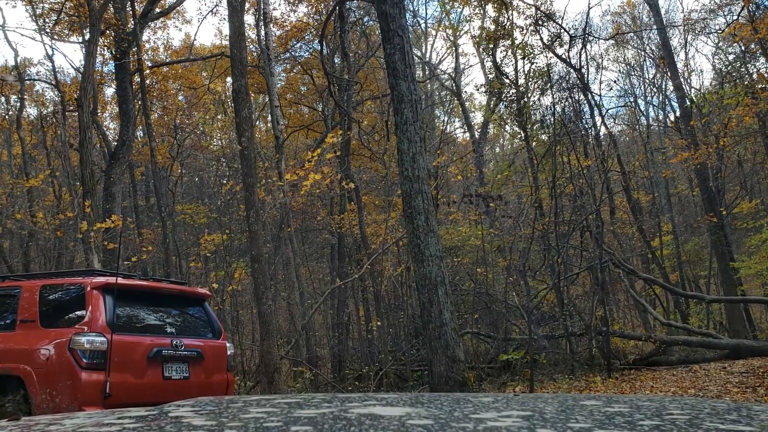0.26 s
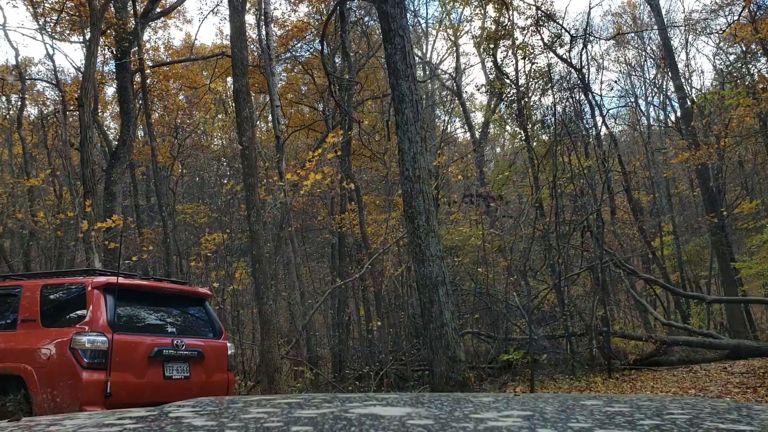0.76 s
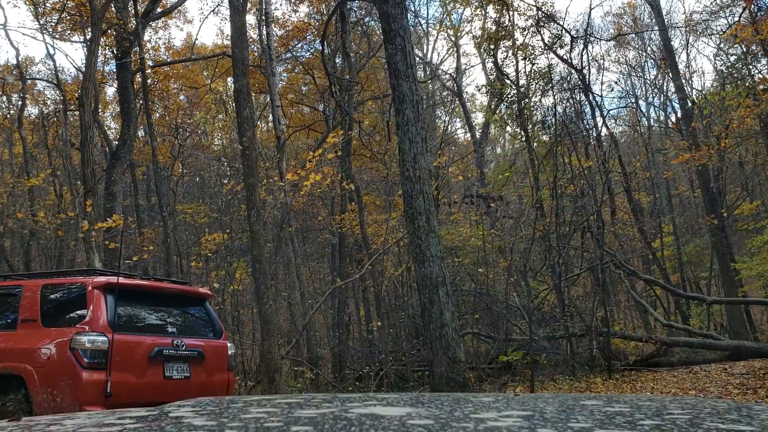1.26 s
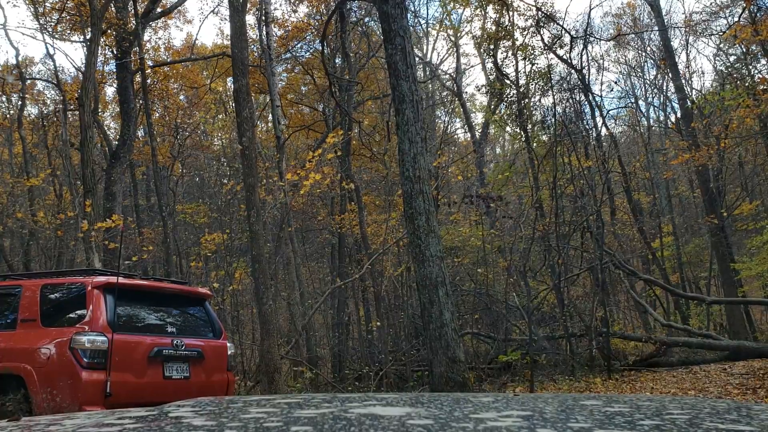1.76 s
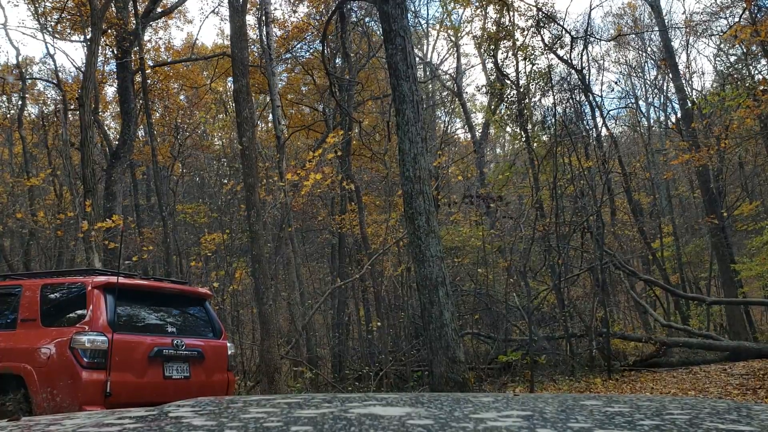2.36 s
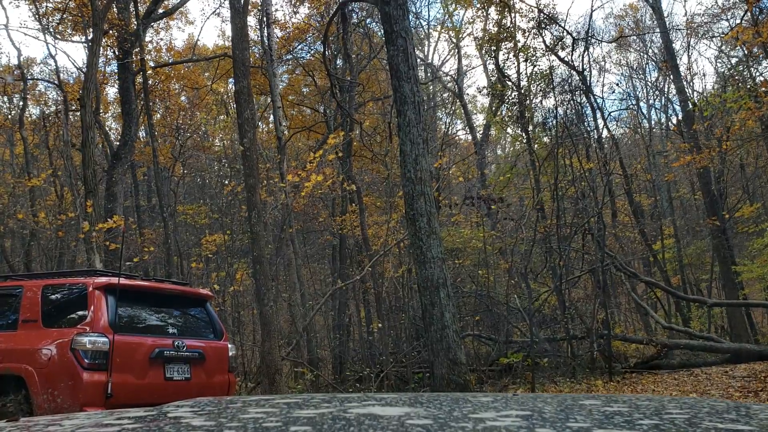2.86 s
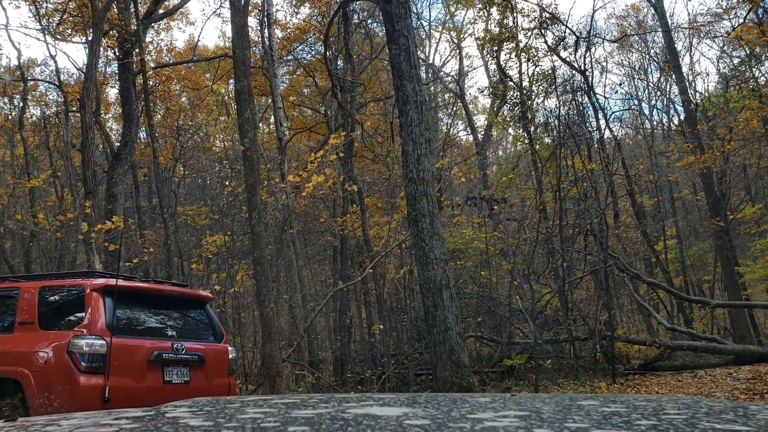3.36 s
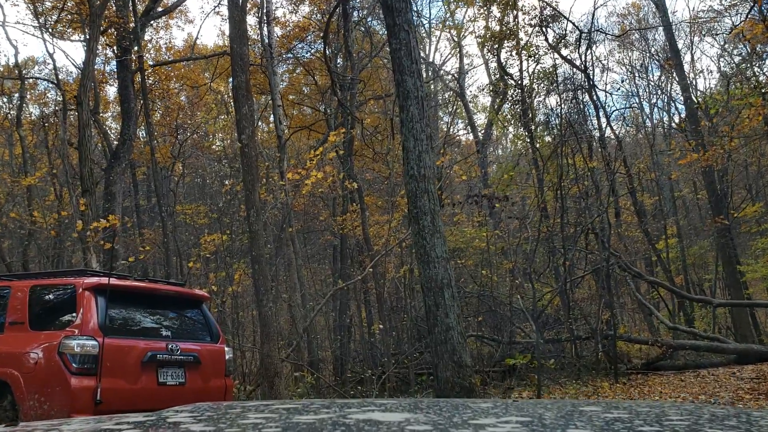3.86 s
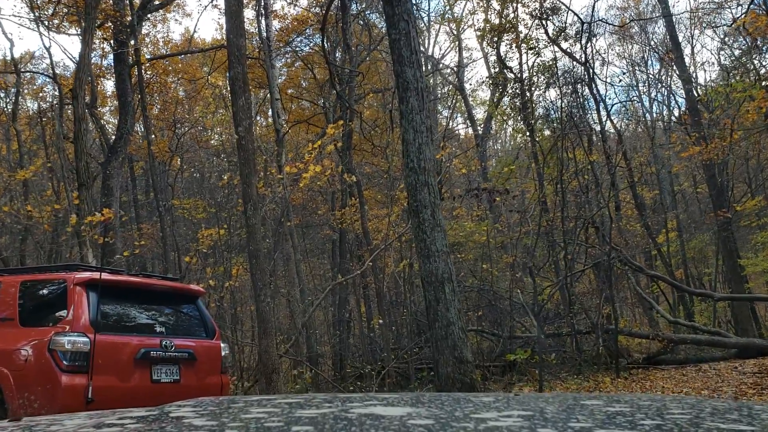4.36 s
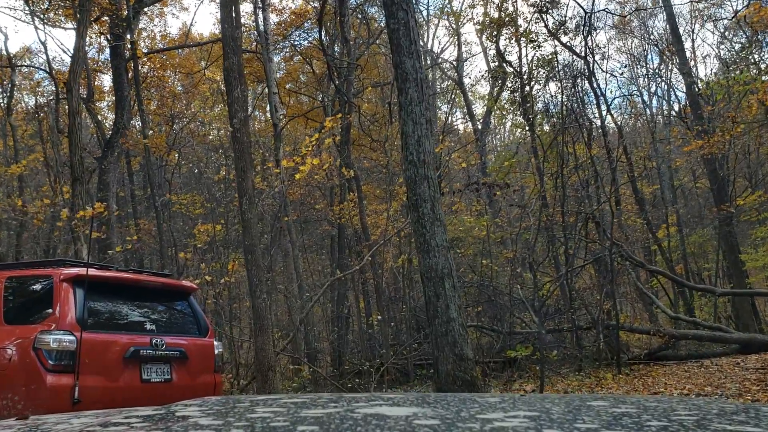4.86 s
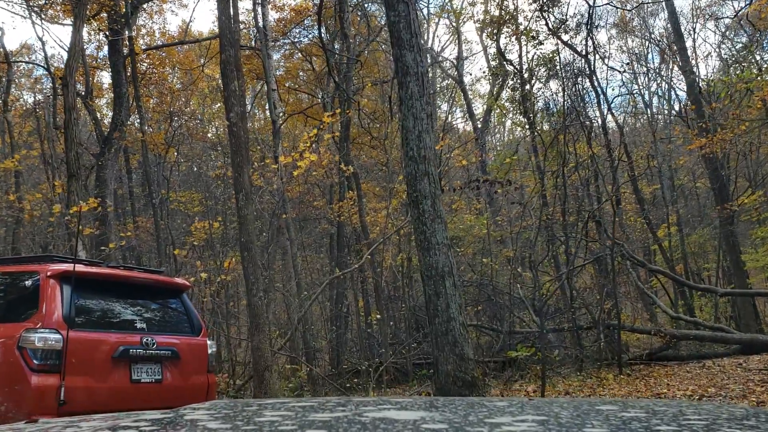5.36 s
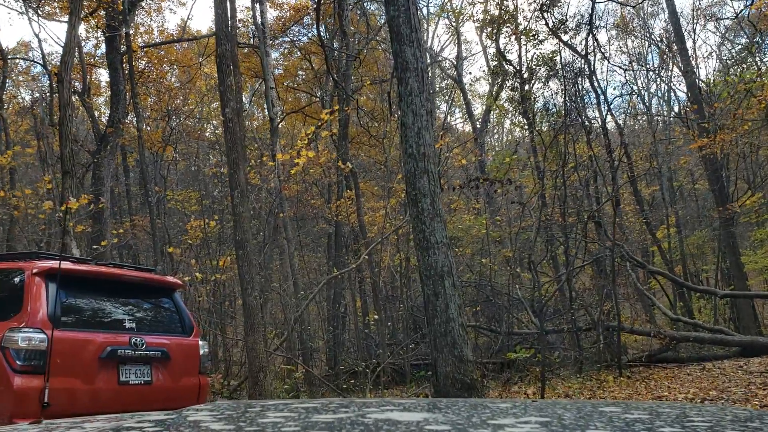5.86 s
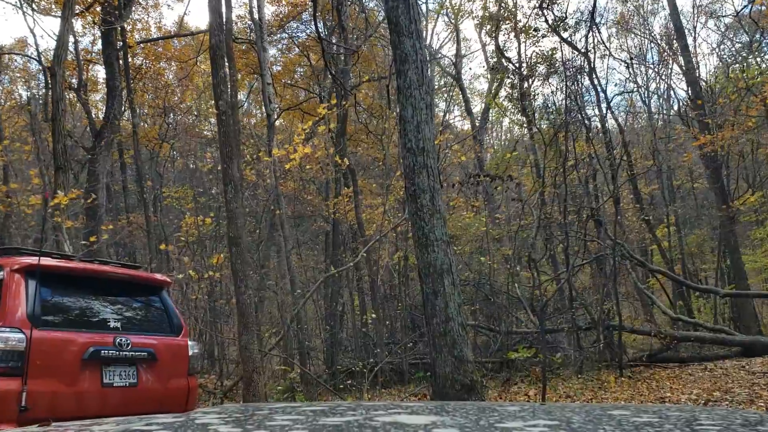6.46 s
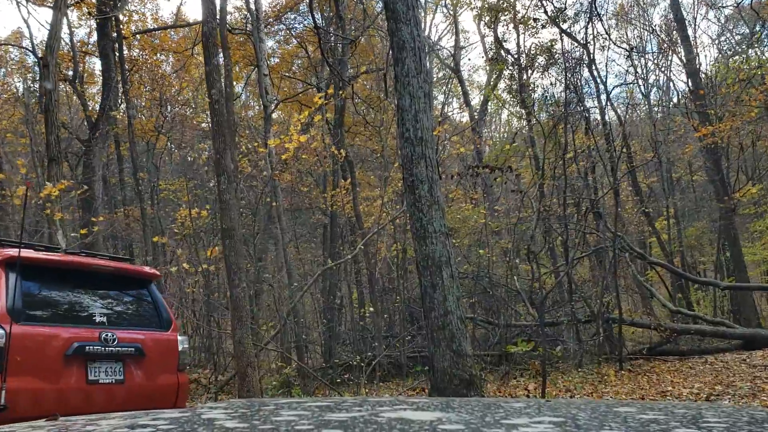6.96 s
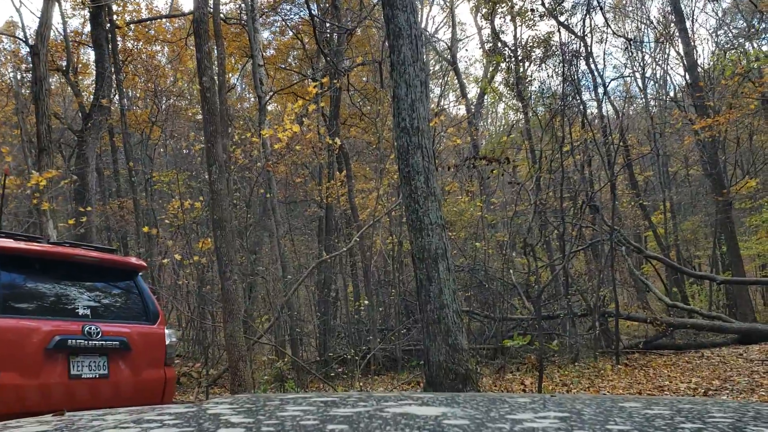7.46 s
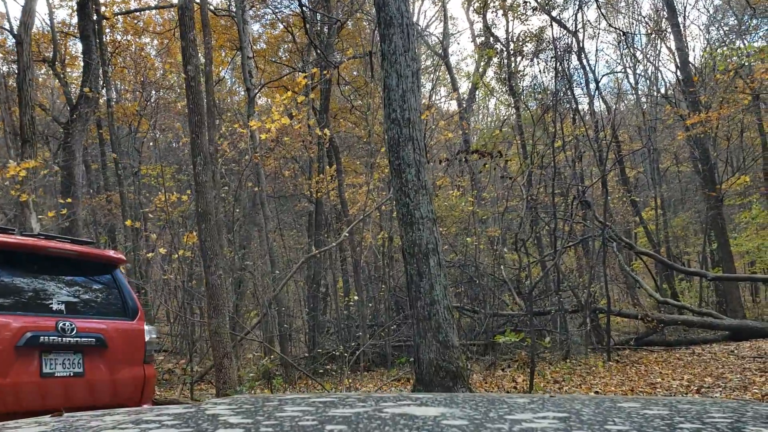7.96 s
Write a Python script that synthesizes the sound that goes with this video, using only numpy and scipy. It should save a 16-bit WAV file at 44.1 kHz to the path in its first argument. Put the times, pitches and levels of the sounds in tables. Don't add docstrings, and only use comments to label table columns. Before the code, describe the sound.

Close stereo cabin sound: steady throbbing idle with airy fan noise from the open door on the right. Fabric rubs and trim bumps as a person gets seated, then a rattling, metallic door slam with a heavy low thump. Afterwards the idle is duller and more enclosed, with faint buckle and switch clicks to the left and a second vehicle's rough engine note rising now and then.

```python
import sys
import numpy as np
from scipy import signal
from scipy.fft import rfft, irfft, next_fast_len
from scipy.io import wavfile
from scipy.ndimage import uniform_filter1d

SR = 44100
rng = np.random.default_rng(int(sys.argv[2]) if len(sys.argv) > 2 else 0)


def voltage_ratio(decibels):
    exponent = np.asarray(decibels, float) / 20
    return 10 ** exponent


def generate_wav(signal):
    frames = np.transpose(np.atleast_2d(signal))
    scaled = np.clip(frames, -1, 1) * 32767
    pcm = np.round(scaled).astype(np.int16)
    wavfile.write(sys.argv[1], SR, pcm)


N = 362502
T = np.arange(N) / SR
HZ = np.fft.rfftfreq(next_fast_len(N, True), 1 / SR)
N_FFT = 2 * len(HZ) - 2
SHUT_S = 2.78
SPACING_M = .15

# (time [s], level [dB])
LOAD = [
    (0, 0),
    (2.7, 0),
    (3, -8),
    (3.65, -7),
    (3.9, -1.5),
    (4.6, -1.5),
    (5.4, -3),
    (8.22, -2.5),
]
# (time [s], firing rate [Hz])
FIRING_RATE = [(0, 38.51), (2.7, 38.23), (3.2, 39.69), (3.8, 38.18), (4.45, 37.64), (4.75, 35.8),
               (5.2, 36.96), (6, 37.24), (6.9, 36.8), (7.5, 37.25), (8.22, 36.85)]
# (multiple of firing rate [-], level [dB])
ORDERS_OPEN = [(1, 1.5), (2, -2), (3, -2.5), (4, -6.5), (5, -11.5), (6, -7.5), (7, -3.5), (8, -16),
               (9, -16.5)]
# (multiple of firing rate [-], level [dB])
ORDERS_SHUT = [(1, 4.5), (2, -4.5), (3, -0.5), (4, -6), (5, -12.5), (6, -4), (7, -11.5), (8, -8), (9, -7)]
# (multiple of firing rate [-], level [dB])
HALF_ORDERS = [(.5, -15), (1.5, -5), (2.5, -11), (3.5, -9), (4.5, -7.5), (5.5, -12)]
CYLINDERS_DB = [2, 1.5, -0.5, 2.5, -4.5, -7.5]
# (frequency [Hz], density [dB/Hz])
RUMBLE = [(12, -31), (20, -5.5), (109, -1), (172, -6.5), (223, -3.5), (329, -7), (380, -17.5), (450, -25),
          (580, -53.5), (990, -120)]
# (frequency [Hz], density [dB/Hz])
BULKHEAD = [(220, -33.5), (380, 0), (513, -7), (697, -5.5), (772, -14.5), (933, -11), (1380, -26.5),
            (2120, -29.5), (2500, -33), (3250, -61.5), (5500, -120)]
# (frequency [Hz], level [dB])
WHINES = [(705, -66.5), (668, -73), (2126, -88), (4258, -95), (4678, -88), (5109, -93), (5512, -85),
          (6400, -94), (6850, -93)]
FIRING_DB, RUMBLE_DB, SHAKE_DB = -46.5, -49, -45.5
RUMBLE_FOLLOWS, SHAKE_FOLLOWS = .6, .8
SHAKE_DIES_S, SHAKE_DIES_DB_S, BODY_CALMS_DB = 4.63, 2.5, 6.5
BULKHEAD_DB = -63
VALVE_S, VALVE_HZ, VALVE_DB = 5.582, 938, -70.3

# (time [s], hold [s], exhaust note at start [Hz], at end [Hz], level [dB])
REVS = [(0, 1.4, 128.1, 131, -52), (1.65, .6, 132, 138, -46.5), (2.5, .6, 132, 122, -49),
        (3.44, .08, 126.9, 126, -43.5), (3.95, .3, 115, 137.6, -52), (4.5, .33, 172, 178, -45),
        (4.9, .1, 180, 192, -47), (5.9, .15, 113, 108.6, -54.5), (6.25, .28, 110.1, 111, -50),
        (6.97, .3, 138, 148.8, -45), (7.62, .12, 143.1, 141, -46), (7.95, .27, 138.1, 135, -54)]
REV_RISE_S, REV_FADE_S = .3, .3

# (frequency [Hz], density [dB/Hz])
BAY = [(240, -32.5), (400, -7), (486, -6), (584, -8), (700, -11.5), (728, -12.5), (996, -7), (2900, -13.5),
       (7400, -21.5), (9000, -22.5), (11700, -54.5), (19800, -120)]
# (time [s], hold [s], fade per 20 dB [s], level [dB])
SHUFFLES = [
    (2.2, .35, .5, -62),
    (3.45, 0.173, 0.18, -70.5),
    (3.85, 0.622, .5, -73.5),
    (5.1, 0.18, 1.55, -76),
]
BAY_DB, BAY_SINKS_DB_S, BAY_SHUT_FADE_S = -59, 1.44, .35
SHUFFLE_RISE_S = .24

# (frequency [Hz], density [dB/Hz])
CLOTH = [(880, -29.5), (1500, -7), (1590, -4.5), (1690, -16), (1920, -24.5), (2230, -8), (4970, -3.5),
         (6630, -6.5), (7390, 0.5), (8160, -10.5), (9650, -12.5), (11500, -6), (16000, -13)]
# (time [s], level [dB])
FIDGET = [(0, -64), (.3, -60), (.75, -62), (1, -69.5), (1.25, -59.5), (1.5, -57.5), (1.75, -64.5),
          (2.75, -64.5), (2.95, -71.5), (3.3, -67.5), (3.73, -81), (4.03, -69.5), (4.3, -75.5),
          (4.78, -69.5), (5.1, -75), (5.75, -76), (5.9, -97)]
# (time [s], hold [s], fade per 20 dB [s], level [dB], body over level [dB])
RUBS = [(0.549, 0.014, 0.13, -54, 2), (.8, 0.0143, 0.01, -55.5, 4.5), (0.989, 0.0097, 0.09, -63, 4),
        (1.059, 0.0204, 0.1, -50, .5), (1.079, 0.0434, 0.0868, -42.5, 0.5),
        (1.134, 0.0338, 0.0684, -46.5, 2), (1.811, 0.1715, 0.22, -50, 0), (2.07, 0.073, 0.29, -57, 2),
        (2.189, .03, 0.0455, -51.5, 0), (2.229, 0.139, .5, -48.5, .5), (3.033, 0.096, 0.11, -63.5, 2),
        (3.446, .015, 0.1054, -57, 1), (3.497, 0.0599, 0.2849, -62, -1), (4.357, 0.0196, 0.1845, -64, 5.5),
        (4.902, 0.078, 0.0935, -63.5, 5), (7.42, .02, 0.3, -77.5, 6), (7.55, 0.00985, 0.21, -74, -0.5)]
FIDGET_BODY_DB, RUB_RISE_S = 3.5, .0466

# (time [s], peak [dB], mode [Hz], t60 [s])
KNOCKS = [(0.082, -37, 379.4, 0.048), (.092, -27.5, 1319, 0.073), (.095, -31, 1053, 0.065),
          (0.549, -43.5, 300, 0.053), (0.545, -44, 571, .07), (0.542, -47, 1000, .06),
          (2.2235, -31, 300, .14), (2.229, -28.5, 350, .12), (2.233, -36, 1560, .09),
          (2.236, -36, 565, .09), (2.232, -38, 1100, .06), (2.238, -40, 750, .06), (2.242, -41, 1500, .05),
          (3.09, -37, 130, .15), (2.905, -25, 150, .12), (2.242, -33, 440, .07), (2.26, -37, 290, .06),
          (2.8655, -22, 80, .2), (2.8785, -14.5, 82, .19), (3, -34, 100, .15), (2.842, -27, 260, .12),
          (2.33, -38, 320, .15), (2.225, -29.5, 180, 0.11), (2.27, -29, 55.2, 0.4), (2.279, -37, 99, 0.23),
          (3.07, -32.5, 55, 0.33), (3.46, -42, 534.8, 0.083), (3.586, -43.5, 1222, 0.058),
          (3.587, -45, 1500, .045), (3.758, -53.5, 592, 0.044), (3.76, -52.5, 903, 0.047),
          (4.776, -49.5, 966, 0.0434), (4.777, -51.5, 1301, 0.0335), (1.951, -42.5, 1099, .03)]
# (time [s], peak [dB], ring [Hz], top [dB])
CLICKS = [(0.0904, -32.5, 3720, -20), (.1005, -39, 2300, -25), (0.0952, -33, 3260, -26),
          (0.5478, -41.5, 2780, -11.5), (0.6657, -32, 2615, -23), (1.1571, -26.5, 5500, -22),
          (1.162, -31.5, 4800, -21.5), (1.4594, -42.5, 3030, -16), (1.785, -41, 3380, -17),
          (1.9518, -36, 3370, -7), (2.6813, -43, 4680, -23.5), (2.8885, -47, 2990, -19),
          (2.9106, -42.5, 4500, -13), (3.0609, -36.5, 4970, -12.5), (3.4362, -45.5, 6450, -14),
          (3.4537, -34.5, 6220, -19.5), (3.5867, -48.5, 2872, -25), (3.748, -52.5, 7430, -14),
          (3.7599, -52, 4280, -10.5), (3.83, -43, 2560, -26), (3.8436, -49, 2500, -21),
          (3.907, -53.5, 4820, -14), (3.9806, -50, 2180, -14.5), (4.0333, -54.5, 4800, -20),
          (4.3505, -46, 6250, -20.5), (4.37, -43.5, 5000, -16.5), (4.4127, -52.5, 2912, -14),
          (4.8648, -56.5, 7220, -13), (4.93, -53, 5000, -22), (4.9, -50, 4940, -15.5),
          (5.1017, -56, 4796, -22), (5.5128, -57.5, 6391, -18), (1.9512, -43, 2450, -25)]
CLICK_T60_S, GLASS_T60_S = .027, .074

# (frequency [Hz], level [dB], t60 [s])
SKIN = [(399, -5, .07), (436, -5, .09), (570.7, -5, .07), (690, -1, .05), (800, -2, .045), (930, 1.5, .055),
        (1214, -3, .04), (1710, -11, .05), (1898, -17.5, .037)]
# (time [s], level [dB])
CATCH_HITS = [
    (2.7597, -25),
    (2.7624, -23),
    (2.7652, -27),
    (2.7682, -23),
    (2.7716, -26),
    (2.7745, -27),
    (2.787, -26),
    (2.794, -24),
    (2.803, -18),
]
# (time [s], hold [s], fade per 20 dB [s], panel [dB], crack [dB])
CLATTER = [
    (2.761, 0.0077, 0.0108, -26, -45),
    (2.788, .007, 0.0202, -31, -24.5),
    (2.797, .005, .028, -24, -20.5),
    (2.825, .01, 0.0861, -38.5, -45),
]
# (frequency [Hz], density [dB/Hz])
CRACK = [(590, -30), (1000, -7), (1750, -1), (4470, -8.5), (4840, -9.5), (5630, -13), (6330, -8),
         (8750, -21), (11600, -16.5), (16000, -32)]
CLATTER_RISE_S = .0049
CRACK_TOP_PAN_DB = -6
# (time [s], hold [s], fade per 20 dB [s], level [dB])
BOOM = [
    (2.771, .04, 0.09, -38),
    (2.83, 0.0534, 0.0738, -29),
    (2.948, 0.136, 1, -46),
]
BOOM_RISE_S = .04
# (time [s], pressure [full scale], contact [s])
BLOWS = [
    (2.7932, .5, 0.001383),
    (2.7967, 0.736, 0.00336),
    (2.8035, .72, 0.00457),
    (2.8309, 0.368, 0.00805),
    (2.9465, .06, .016),
]
# (frequency [Hz], level [dB], t60 [s])
CABIN = [(27, -6, .75), (76.8, 3, 0.2), (91, -8, 0.46), (115, -4, 0.35), (150.07, -8.5, .25),
         (190, -20, .2), (258, -9, .17), (300, -8, 0.18), (382, -14, .15)]
REBOUND, REBOUND_LATE, REBOUND_WIDE = .7, 1.38, 1.1
# (frequency [Hz], level [dB], t60 [s])
LATCH = [(2390, -12.5, 0.036), (2833, -11, 0.016), (3747, -14.5, 0.028), (4200, -6, .045),
         (4423.6, -6, 0.029), (6300, -17.5, 0.035)]
# (time [s], level [dB], ring [Hz], t60 [s])
SNAPS = [
    (2.7835, -10, 4480, .014),
    (2.7868, -18, 4550, .012),
    (2.7912, -21, 3000, .01),
    (2.7932, -17, 2750, .011),
    (2.7978, -15, 1750, .013),
    (2.8006, -14, 2250, .012),
    (2.8022, -18, 3600, .01),
    (2.8055, -24, 2900, .015),
    (2.812, -23, 1650, .02),
    (2.822, -31, 2900, .02),
]
LATCH_S, LATCH_DB, LATCH_BOUNCE_S = 2.7822, -14.5, .0017

# (frequency [Hz], density [dB/Hz])
HISS = [(710, -14), (1200, -1), (1270, -12), (1850, -13.5), (2130, -19.5), (3150, -16), (4600, -17.5),
        (7020, -9), (8440, -20), (15200, -18.5), (16000, -14.5)]
HISS_DB = -74.5


def unit(x):
    return x / np.sqrt(np.mean(x ** 2))


def curve(rows):
    s, value = np.transpose(rows)
    return np.interp(T, s, value)


def colour(points):
    hz, db = np.transpose(points)
    return voltage_ratio(np.interp(np.log(HZ + 1), np.log(hz), db))


def peak(hz, width_hz):
    return 1 / np.sqrt(1 + ((HZ ** 2 - hz ** 2) / (width_hz * HZ + 1)) ** 2)


def walk(rate_hz):
    t = T[::22]
    k = max(int(SR / 22 / rate_hz), 1)
    held = np.repeat(rng.standard_normal(len(t) // k + 1), k)
    slewed = uniform_filter1d(uniform_filter1d(held, k), k)
    return np.interp(T, t, slewed[:len(t)])


def bursts(start_s, hold_s, fade_s, rise_s):
    t = T[::44] - np.c_[start_s]
    rise = np.maximum(-t, 0) / rise_s
    fade = np.maximum(t - np.c_[hold_s], 0) / np.c_[fade_s]
    return voltage_ratio(np.maximum(-20 * (rise + fade), -200))


def together(shapes, db):
    return np.interp(T, T[::44], np.sqrt(voltage_ratio(2 * np.asarray(db)) @ shapes ** 2))


def shaped(gain, gate, count):
    if np.ndim(gate):
        return rfft(gate * rng.standard_normal((count, N)), N_FFT) * gain
    return rng.standard_normal((count, 2 * len(HZ))).view(complex) * gain


def diffuse(gain, gate=1):
    alike = np.sinc(2 * HZ * SPACING_M / 343)
    mid, side = shaped(gain * np.sqrt(1 + np.array([alike, -alike])), gate, count=2)
    return unit(irfft(np.array([mid + side, mid - side]))[:, :N])


def aside(x, lag_s, pan_db=0):
    margin = SR // 500
    padded = np.pad(x, margin, mode="reflect", reflect_type="odd")
    late = padded[margin - round(lag_s * SR):][:N]
    return np.array([late * voltage_ratio(pan_db / 2), x * voltage_ratio(-pan_db / 2)])


def nearby(gain, gate=1, lag_s=-.00043, pan_db=8.0):
    direct = unit(irfft(shaped(gain, gate, count=1))[0, :N])
    return .6095 * aside(direct, lag_s, pan_db) + .862 * diffuse(gain, gate)


def tick(s):
    return np.maximum(0, 1 - np.abs(T - s) * SR)


def ring(force, modes):
    a, b = np.flatnonzero(force)[[0, -1]]
    span = slice(a, b + SR)
    out = np.zeros(len(force))
    for hz, db, t60_s in modes:
        pole = np.exp((2j * np.pi * hz - np.log(1000) / t60_s) / SR)
        out[span] += voltage_ratio(db) * signal.lfilter([1], [1, -pole], force[span] + 1e-18j).imag
    return out


def firing_orders(turns, load_db):
    shut = np.clip((T - SHUT_S) / 2.6, 0, 1)
    orders = [(k, a + shut * (b - a)) for (k, a), (_, b) in zip(ORDERS_OPEN, ORDERS_SHUT)]
    lope = np.cos(2 * np.pi * (turns / 6 - .3))
    calm_db = np.clip(SHAKE_DIES_DB_S * (T - SHAKE_DIES_S + .5), 0, BODY_CALMS_DB)
    tone = 0
    for k, db in orders + HALF_ORDERS:
        lope_db = 4.54 * lope + 1 if k == 9 else .25 * k * lope
        db = db + 1.3 * walk(7) + lope_db
        if k == 1:
            db = db - .5 * load_db - calm_db
        phase = k * turns + rng.random() + .03 * walk(6)
        tone = tone + voltage_ratio(db[::8]) * np.sin(2 * np.pi * phase[::8])
    level = 1.028 * voltage_ratio(FIRING_DB + load_db)
    return aside(level * np.interp(T, T[::8], tone), -.0001, .909)


def valve_tap(turns):
    tap = np.diff(np.floor(turns / 6), prepend=turns[0] // 6)
    tap = tap * voltage_ratio(1.5 * walk(6) + np.interp(T, [3.6, 4.4], [-7, 0]))
    tap = uniform_filter1d(tap, 500) * (1 + .4 * rng.standard_normal(N))
    tap = tap * np.sin(2 * np.pi * VALVE_HZ * T)
    return voltage_ratio(VALVE_DB) * unit(ring(tap, [(VALVE_HZ, 0, .11), (1210, -2, .08)]))


def belt_whine():
    hum = 0
    for hz, db in WHINES:
        level = voltage_ratio(db + 1.0 + 2.8 * walk(25))
        hum = hum + level * np.sin(2 * np.pi * (hz * T + .12017 * walk(20)))
    return hum


def engine():
    load_db = curve(LOAD)
    turns = np.cumsum(curve(FIRING_RATE)) / SR
    turns = turns - np.interp(VALVE_S, T, turns)
    tone = firing_orders(turns, load_db)

    firing = np.floor(turns).astype(int)
    strength_db = np.array(CYLINDERS_DB)[firing % 6] + 1.3 * rng.standard_normal(400)[firing % 400]
    throb = voltage_ratio(strength_db) * (.29 + np.exp(-(turns % 1) / .45))
    rumble_db = RUMBLE_DB + RUMBLE_FOLLOWS * load_db
    rumble = voltage_ratio(rumble_db + .3) * nearby(colour(RUMBLE), throb)

    shake_db = SHAKE_DB + SHAKE_FOLLOWS * load_db
    shake_db = shake_db - SHAKE_DIES_DB_S * np.maximum(T - SHAKE_DIES_S, 0)
    shake = voltage_ratio(shake_db - 5) * diffuse(peak(65, 40) ** 2)
    whirr = voltage_ratio(BULKHEAD_DB) * nearby(colour(BULKHEAD), 1 + .299 * throb)
    details = aside(valve_tap(turns) + belt_whine(), -.0004, 2.5)
    return tone + details + rumble + shake + whirr


def neighbour():
    s, hold_s, from_hz, to_hz, db = np.transpose(REVS)
    hz = np.interp(T, np.c_[s, s + hold_s].ravel(), np.c_[from_hz, to_hz].ravel())
    phase = 2 * np.pi * (np.cumsum(hz) / SR + .35 * walk(11))
    note = voltage_ratio(1.5 * walk(10) + 1) * np.sin(phase)
    note = note + voltage_ratio(-6 + 1.5 * walk(9.9)) * np.sin(phase / 2)
    level = together(bursts(s, hold_s, REV_FADE_S + 0 * s, REV_RISE_S), db)
    return aside(level * note, -.0001, 1.1)


def bay():
    s, hold_s, fade_s, db = np.transpose(SHUFFLES)
    gap_db = BAY_DB - BAY_SINKS_DB_S * T - 20 * np.maximum(T - SHUT_S, 0) / BAY_SHUT_FADE_S
    level = np.hypot(voltage_ratio(gap_db), together(bursts(s, hold_s, fade_s, SHUFFLE_RISE_S), db))
    return level * voltage_ratio(5.5 + .9 * walk(15)) * nearby(colour(BAY), lag_s=.00044, pan_db=2.0)


def cloth():
    s, hold_s, fade_s, db, body_db = np.transpose(RUBS)
    rubs = bursts(s, hold_s, fade_s, RUB_RISE_S)
    fidget = voltage_ratio(curve(FIDGET))
    top = np.hypot(fidget, together(rubs, db))
    body = np.hypot(fidget * voltage_ratio(FIDGET_BODY_DB), together(rubs, db + body_db))
    grain_db = 1.5 * rng.exponential(size=N // 40 + 1).repeat(40)[:N]
    grain = voltage_ratio(grain_db + 1.5 * walk(40))
    low = 1 / (1 + (HZ / 7800) ** 16)
    seated = T > SHUT_S
    parts = [(low, body * voltage_ratio(-1.1), 1.4 + 5.406 * seated),
             (1 - low, top * voltage_ratio(.07), -4 + 5.5 * seated)]
    out = 0
    for share, level, pan_db in parts:
        pan = voltage_ratio(np.array([pan_db, -pan_db]) / 2)
        out = out + level * pan * diffuse(colour(CLOTH) * share, grain)
    return out


def knocks():
    before, after, length = np.zeros(N), np.zeros(N), SR // 2
    for s, db, hz, t60_s in KNOCKS:
        contact = np.zeros(length)
        contact[:1024] = .13 * rng.standard_normal(1024) * np.exp(-T[:1024] / .0039)
        contact[0] = 1
        sound = ring(contact, [(hz, 0, t60_s), (1.01 * hz, 0, .14 * t60_s)])
        k = int(s * SR)
        side = before if s < 3.3 else after
        side[k:k + length] += sound * voltage_ratio(db + 3) / np.abs(sound).max()
    return aside(before, .0004, 1.18) + aside(after, -.00019, 3.8)


def clicks():
    out, length = np.zeros((2, N)), 4096
    t, hz = T[:length], np.fft.rfftfreq(length, 1 / SR)
    decay = voltage_ratio(-60 * t / CLICK_T60_S) + .154 * voltage_ratio(-60 * t / GLASS_T60_S)
    shape = (1 - np.exp(-t / .000415)) * decay
    for s, db, ring_hz, top_db in CLICKS:
        pan_db = 1.5 if s < 3.3 else 7.5
        gain = 1 / (1 + ((hz - ring_hz) / (.24 * ring_hz)) ** 2)
        gain = gain + .12 * (hz > 600) / (1 + (hz / 7500) ** 8)
        gain = gain + voltage_ratio(top_db) * (hz > 8000)
        near, left, right = shape * irfft(rfft(rng.standard_normal((3, length))) * gain)
        lag = 16 if s < 3 else -10
        pair = np.array([np.roll(near, lag) + 1.1 * left, near + 1.1 * right])
        level = voltage_ratio(db + np.array([[pan_db], [-pan_db]]) / 2)
        k = int(s * SR)
        out[:, k:k + length] += pair * level * 1.731 / np.abs(pair).max()
    return out


def door_skin():
    hits = sum(voltage_ratio(db) * tick(s) for s, db in CATCH_HITS)
    return aside(ring(hits, SKIN), .00038, .3005)


def seal_clatter():
    s, hold_s, fade_s, panel_db, crack_db = np.transpose(CLATTER)
    shapes = bursts(s, hold_s, fade_s, CLATTER_RISE_S)
    top_db = CRACK_TOP_PAN_DB * (HZ > 6000) * np.array([[.5], [-.5]])
    crack = irfft(rfft(diffuse(colour(CRACK)), N_FFT) * voltage_ratio(top_db))[:, :N]
    crack = together(shapes, crack_db) * voltage_ratio(2.5 + 3.4 * walk(250)) * crack
    panel = diffuse(peak(500, 500) + .6 * peak(1000, 800))
    return together(shapes, panel_db - 5) * panel + crack


def pressure_bump(s, width_s):
    return np.interp(T, s + width_s * np.linspace(-.5, .5, num=21), np.hanning(21))


def cabin_boom():
    push = 0
    for s, pressure, contact_s in BLOWS:
        back = pressure_bump(s + REBOUND_LATE * contact_s, REBOUND_WIDE * contact_s)
        push = push + pressure * (REBOUND * back - pressure_bump(s, contact_s))
    modes = voltage_ratio(-56.5) * ring(push, CABIN)
    s, hold_s, fade_s, db = np.transpose(BOOM)
    level = together(bursts(s, hold_s, fade_s, BOOM_RISE_S), db)
    air = diffuse(peak(85, 70) ** 2 + .6 * peak(170, 80) ** 2)
    return aside(push + modes, .00047, .4) + level * air


def latch():
    pings = []
    for lag_s in (.00047, 0):
        hit_s = LATCH_S + lag_s
        pings.append(ring(tick(hit_s) + .99 * tick(hit_s + LATCH_BOUNCE_S), LATCH))
    snaps = 0
    for s, db, hz, t60_s in SNAPS:
        force = tick(s) + .6 * tick(s + 2 / hz)
        snaps = snaps + voltage_ratio(db) * ring(force, [(hz, 0, t60_s), (1.13 * hz, -5, t60_s)])
    return voltage_ratio(LATCH_DB) * np.array(pings) + aside(snaps, .00043, 1.2)


def scene():
    cabin = engine() + neighbour() + bay() + cloth() + knocks() + clicks()
    return cabin + door_skin() + seal_clatter() + cabin_boom() + latch()


def top_cut(x):
    return signal.sosfilt(signal.butter(12, 15870, fs=SR, output="sos"), x)


def record(dry):
    hiss = unit(irfft(shaped(colour(HISS), 1, count=2))[:, :N])
    hiss = hiss * voltage_ratio(np.array([[1.5], [-1.5]]))
    wet = np.tanh(.7183 * (dry + voltage_ratio(HISS_DB + 6) * hiss)) / .6714
    low_pass = signal.ellip(8, .2, 70, 15750, fs=SR, output="sos")
    return top_cut(signal.sosfilt(low_pass, wet))


dry = scene()
out = record(dry)
generate_wav(out)
```